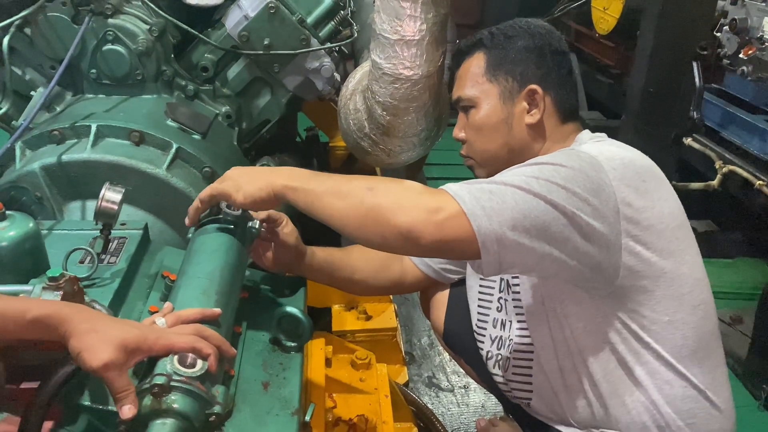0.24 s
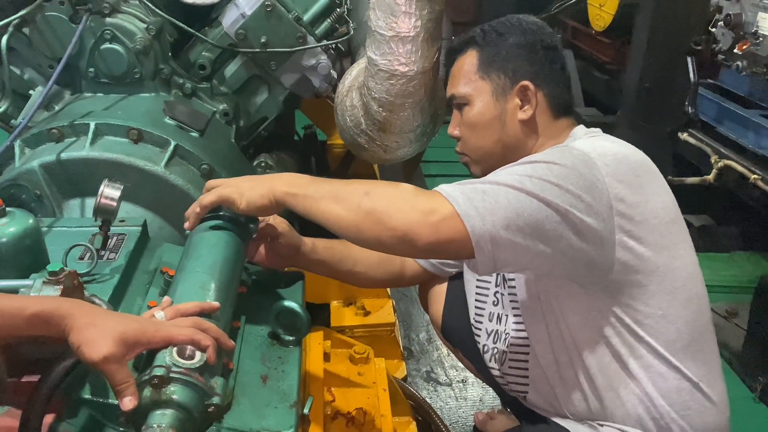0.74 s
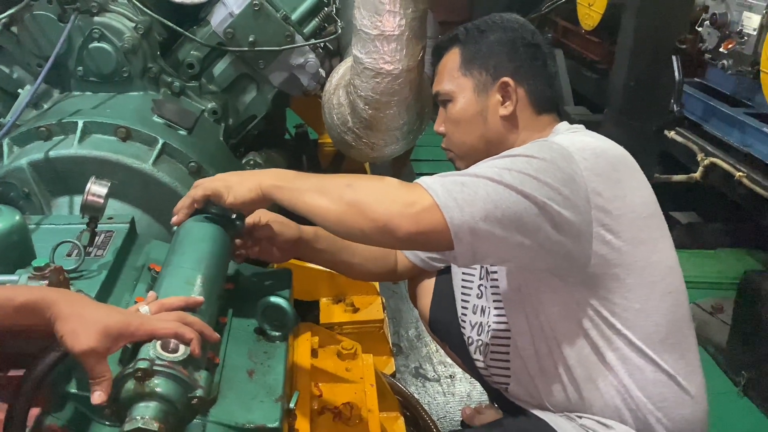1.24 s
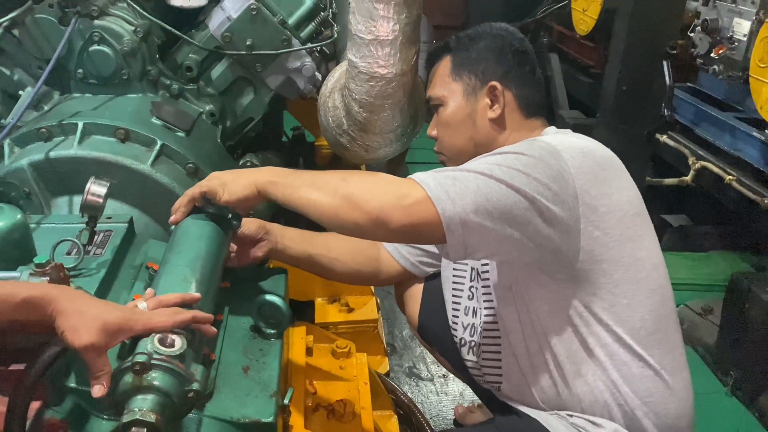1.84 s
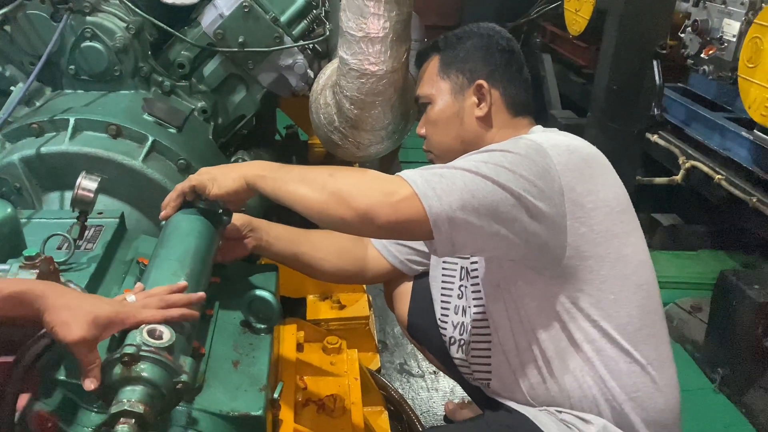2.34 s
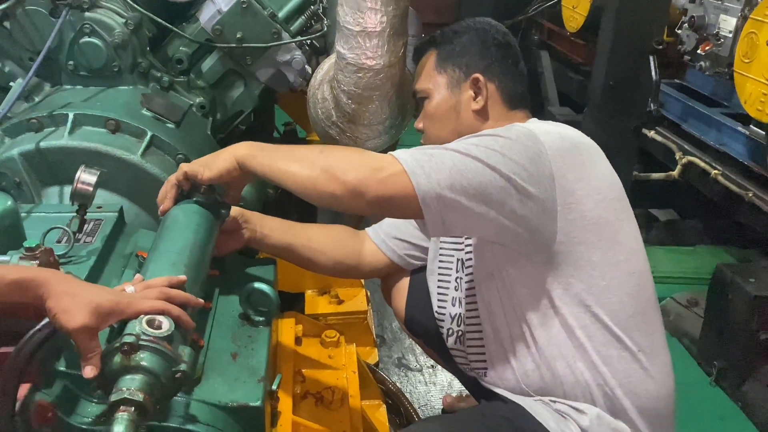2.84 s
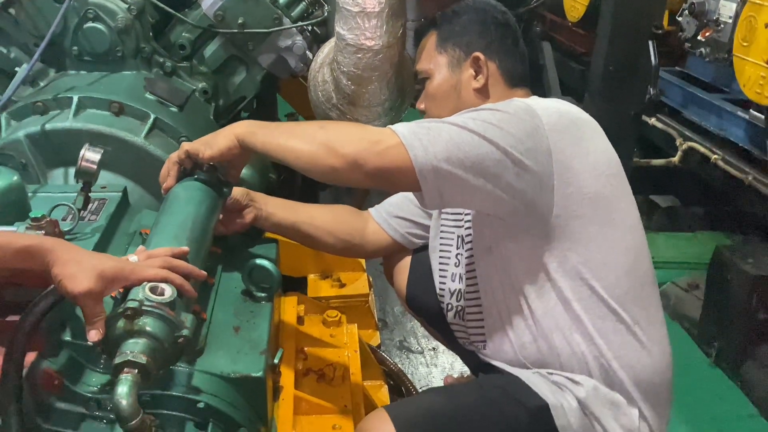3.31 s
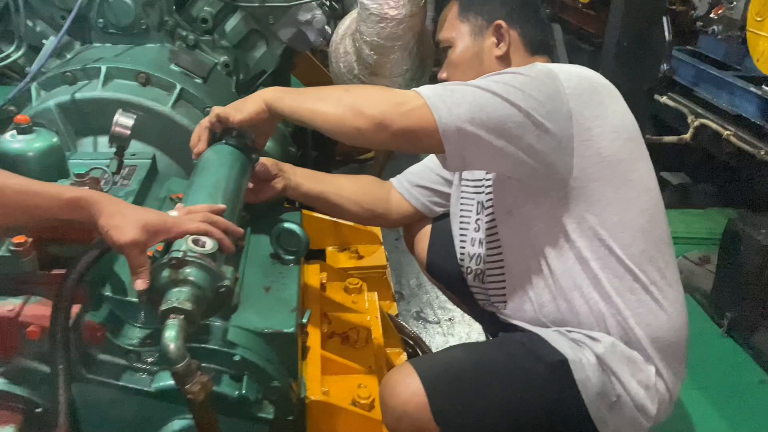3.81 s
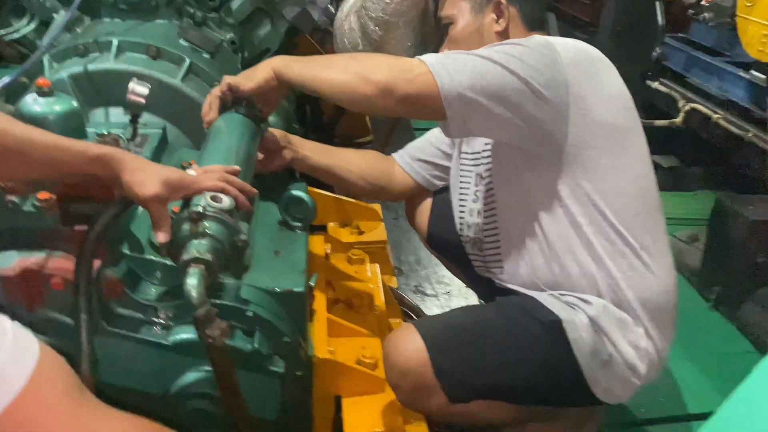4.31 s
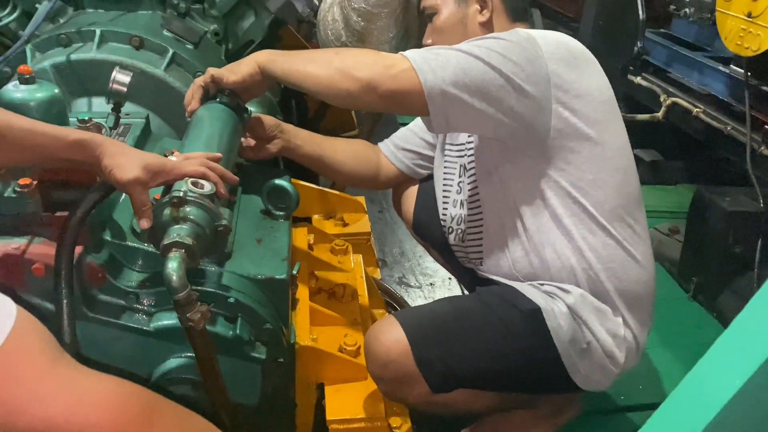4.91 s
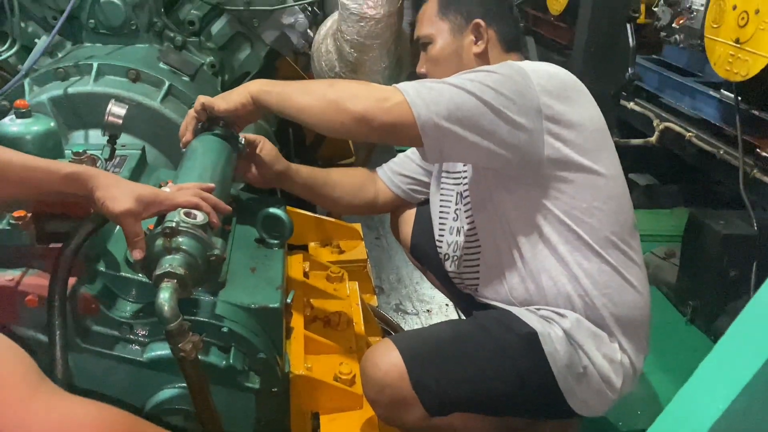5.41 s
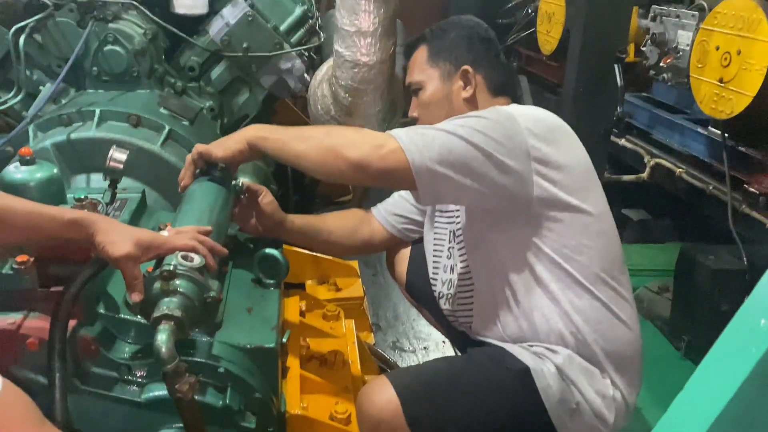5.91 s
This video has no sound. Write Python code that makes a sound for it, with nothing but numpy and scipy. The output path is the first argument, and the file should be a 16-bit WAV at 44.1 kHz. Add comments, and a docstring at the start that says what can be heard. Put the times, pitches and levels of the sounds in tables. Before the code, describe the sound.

A marine diesel idles steadily in a steel engine room, low rapid hull throb under a loud, slightly rough gear-pump whine that slowly fades.

```python
"""A marine diesel idles in a steel engine room, heard from beside its gearbox: hull thumps built of cycle harmonics.
Thin steady tones locked to engine speed ring on top and beat; valve clatter and rushing air are noise through
casing modes. A geared pump hums in shaft harmonics and whines at the tooth rate, in step with the engine.
The microphone rests, then drifts: the whine fades and its right side dips at a node."""
import sys
import numpy as np
from scipy import signal
from scipy.fft import rfft, irfft
from scipy.io import wavfile
from scipy.ndimage import uniform_filter1d

SR = 44100
rng = np.random.default_rng(int(sys.argv[2]) if len(sys.argv) > 2 else 0)


def generate_wav(signal):
    """Clip the signal to [-1, 1] and save it as 16-bit WAV at the path in sys.argv[1]."""
    frames = np.transpose(np.atleast_2d(signal))
    scaled = np.clip(frames, -1, 1) * 32767
    pcm = np.round(scaled).astype(np.int16)
    wavfile.write(sys.argv[1], SR, pcm)


N = 271215

# engine speed: (time [s], four-stroke cycle rate [Hz])
SPEED_CURVE = [(0, 12.288), (1.3, 12.263), (3, 12.286), (6.15, 12.296)]
START_CYCLE_HZ = SPEED_CURVE[0][1]
PUMP_RATIO = 6.4445  # shaft turns per engine cycle
MOVE_S = 1.44  # microphone rests until here, then drifts evenly to the end


def from_db(db):
    """Decibels to gain."""
    return 10 ** (np.asarray(db) / 20)


def in_time(rows):
    """Each column of a curve, sample by sample."""
    time_s, *columns = np.transpose(rows)
    return [np.interp(np.arange(N) / SR, time_s, column) for column in columns]


def at_hz(points, hz):
    """Read a spectrum on a log-frequency axis."""
    known_hz, values = np.transpose(points)
    return np.interp(np.log(hz + 1), np.log(known_hz + 1), values)


def pan(db):
    """Left and right gains for a left-right level difference."""
    return from_db(np.array([[.5], [-.5]]) * db)


def drift(corner_hz):
    """Slow noise of spread 1 whose spectrum falls off above corner_hz."""
    size = 8192
    hz = np.arange(size // 2 + 1) * SR / N
    slow = irfft(rfft(rng.standard_normal(size)) / (1 + (hz / corner_hz) ** 2))
    return np.interp(np.arange(N) * size / N, np.arange(size), slow / slow.std())


def tone(turns):
    """A sine of rms 1."""
    return np.sqrt(2) * np.sin(2 * np.pi * turns)


def travelled():
    """Share of the microphone's drift that lies behind it, 0 to 1."""
    return np.interp(np.arange(N) / SR, [MOVE_S, N / SR], [0, 1])


def along_path(start, end):
    """A value that changes evenly as the microphone drifts."""
    return start + (end - start) * travelled()


def at_ports(turns, hz, db, pan_db, lead_turns=0.056, spread_turns=0.14, waver_db=1.2):
    """A tone at both microphone ports; shorter waves fall further out of step, changing along the path."""
    # lead and spread hold at 800 Hz
    start, end = (hz / 800) ** 1.5 * (lead_turns + spread_turns * rng.standard_normal(2))
    lead = along_path(start, end)
    turns = turns + rng.random()
    pair = np.array([tone(turns + lead / 2), tone(turns - lead / 2)])
    return from_db(db + waver_db * drift(4.6)) * pan(pan_db) * pair


def engine_hum(cycles, level_db=0.6, uneven=0.055, quarter_turn_hz=500, thump_s=.0501):
    """One thump a cycle: harmonics delayed in phase by hull modes, each wavering; short waves differ at the ports."""
    # (multiple of cycle rate, start level before level_db [dB], end level [dB], left-right [dB])
    engine_orders = [(4, -41.0, -41.5, -3.0), (5, -43.0, -44.0, -3.0), (6, -42.0, -42.5, -3.5),
                     (7, -45.5, -44.0, -2.0), (8, -44.5, -40.0, -2.5), (9, -43.5, -43.0, -4.5),
                     (10, -51.0, -50.0, -4.5), (11, -45.5, -47.5, -0.5), (12, -39.0, -38.0, 0.0),
                     (13, -44.0, -45.5, -0.5), (14, -35.5, -33.5, -4.0), (15, -32.0, -32.0, -0.5),
                     (16, -40.5, -37.5, -2.5), (17, -47.5, -45.0, 1.5), (18, -46.0, -46.5, 1.5),
                     (19, -40.0, -42.0, -0.5), (20, -45.5, -43.5, -0.5), (24, -45.5, -50.5, 3.5),
                     (25, -41.5, -36.0, 2.0), (26, -39.5, -42.5, -4.0), (27, -45.5, -40.5, -3.0),
                     (28, -54.5, -48.0, -1.0)]
    # hull modes that hold the thump back: (frequency [Hz], width [Hz])
    hull_modes = [(71, 3), (74, 3), (143, 11), (177, 3), (230, 3), (245, 52), (247, 9), (328, 2)]
    out = 0
    for order, start_db, end_db, pan_db in engine_orders:
        hz = order * START_CYCLE_HZ
        lags_rad = [np.arctan2(width_hz / 2, mode_hz - hz) for mode_hz, width_hz in hull_modes]
        held_turns = sum(lags_rad) / (2 * np.pi)
        lead_turns = (hz / quarter_turn_hz) ** 1.5 / 4
        turns = order * cycles - hz * thump_s - held_turns
        line = np.array([tone(turns + lead_turns / 2), tone(turns - lead_turns / 2)])
        line = line * (1 + uneven * drift(5.9))
        out = out + from_db(along_path(start_db, end_db)) * line * pan(pan_db)
    return from_db(level_db) * out


def machine_tones(cycles, level_db=-1.2):
    """Thin steady tones locked to engine speed, singing in the casings; close neighbours beat."""
    # (frequency at first engine speed [Hz], start level before level_db [dB], end level [dB], left-right [dB])
    tones = [(88.5, -51, -51, -2), (205.1, -48, -48, -1), (316.7, -52, -52, -6), (374.9, -54, -49, -4),
             (393.1, -55, -48, -1), (417.6, -56, -53, 3), (464.1, -52, -48, 4), (515.9, -53, -51, 1),
             (600, -51, -49, 5), (614.2, -53, -48, 5), (629.7, -42, -48, 2), (638.7, -51, -49, 9),
             (663.3, -50, -50, 3), (700.3, -59, -47, 3), (724.9, -45, -48, 12), (755.5, -42, -48, 5),
             (767.6, -48, -56, 6), (814.1, -50, -45, 3), (816.4, -46, -40, 4), (823.2, -48, -55, 7),
             (826.5, -44, -45, 5), (847.7, -46, -49, 3), (858.8, -41, -46, 3), (881.4, -42, -35, 5),
             (883.4, -48, -42, 5), (926.8, -46, -46, 4), (929.8, -52, -43, 16), (937.9, -48, -45, 17),
             (939.3, -49, -47, 17), (1007.6, -48, -57, 2), (1029.5, -50, -54, -2), (1105.5, -52, -60, 6),
             (1108.5, -53, -53, 3), (1179.9, -54, -54, 1), (1192, -51, -48, -5), (1204.5, -51, -53, 1),
             (1253.5, -55, -51, 1), (1430.6, -53, -50, 8), (1662.8, -56, -50, -10)]
    out = 0
    for hz, start_db, end_db, pan_db in tones:
        turns = hz / START_CYCLE_HZ * cycles
        out = out + at_ports(turns, hz, level_db + along_path(start_db, end_db), pan_db)
    return out


def contact_pattern(cycles, count=6, clump_db=2.5, clump_s=.002):
    """Random contacts in uneven clumps, looped each cycle; the pattern crossfades gradually through count versions."""
    size = int(SR / START_CYCLE_HZ)
    place = np.round(cycles * size).astype(int) % size
    stage = np.linspace(0, count - 1, N)
    clumps = uniform_filter1d(rng.standard_normal(size), max(int(clump_s * SR), 1), mode="wrap")
    force = from_db(clump_db * clumps / clumps.std())
    force = force / np.sqrt(np.mean(force ** 2))
    out = 0
    for k in range(count):
        contacts = force * rng.standard_normal((2, size))
        fade = np.cos(np.pi / 2 * np.clip(stage - k, -1, 1))  # equal power
        out = out + contacts[:, place] * fade
    return out


def casings(field, count=7, shift_db=2.0):
    """Casing resonances colour a spectrum; each lift follows the drift and shifts by chance from stage to stage."""
    # (frequency [Hz], width [Hz], start lift before chance shifts [dB], end lift [dB])
    casing_modes = [(592, 55, 9.5, 7.5), (632, 53, 5, 7), (691, 32, 6, 13.5), (813, 38, 5, 15.5),
                    (792, 56, 9, 2), (858, 75, 7, -1), (944, 57, 10, 8), (986, 37, -5, 8),
                    (1130, 18, 8.5, 6), (1175, 55, 5, 5), (1304, 33, 7, 2), (1423, 43, 6, 7.5),
                    (1588, 26, 4.5, 3), (1657, 23, 7, 1), (1750, 40, 6.5, 6), (1925, 34, 6.5, 7),
                    (2040, 33, 3, -1), (2125, 23, 9.5, 3), (2480, 31, 6, 3.5), (2616, 86, 7.5, 7.5),
                    (2774, 46, 6.5, 4), (3010, 73, 8.5, 3), (3180, 34, 6.5, 8), (3430, 47, 7.5, 8),
                    (3730, 69, 7, 5), (4000, 35, 6, 1), (4140, 100, 5.5, 5.5), (4304, 45, 11, 5.5),
                    (4610, 70, 8, 3), (4980, 170, 5.5, 2), (5600, 165, 2, 3), (8000, 540, -0.5, -3)]
    hz = np.arange(N // 2 + 1) * SR / N
    mode_hz, width_hz, start_db, end_db = np.transpose(casing_modes)
    bells = 1 / (1 + (2 * (hz - mode_hz[:, None]) / width_hz[:, None]) ** 2)
    stage, way, out = np.linspace(0, count - 1, N), travelled(), 0
    for k in range(count):
        # short waves shift most
        chance_db = shift_db * np.minimum(mode_hz / 2000, 1) * rng.standard_normal(len(casing_modes))
        lifts_db = start_db + (end_db - start_db) * np.interp(k, stage, way) + chance_db
        fade = np.maximum(1 - abs(stage - k), 0)
        out = out + fade * irfft(field * from_db(lifts_db @ bells), N)
    return out


def clatter(cycles, growl_db=1.53, rest_hiss_db=-4, hiss_fade_db=2.6, repeat_share=0.44, knock_db=0.24,
            grain_db=1.0, light_hz=350, air_hz=4200, hiss_hz=3500, flutter_db=0.96):
    """Small contacts recurring every cycle mix with fresh turbulence; both ring in the casings over a low rumble."""
    # spectra ahead of the casings, below and above: (frequency [Hz], density [dB per Hz])
    rumble = [(20, -78), (40, -76), (60, -67.3), (110, -66), (160, -64), (260, -65), (320, -64), (370, -66),
              (480, -64.5)]
    rush = [(700, -68.5), (1050, -65.5), (2000, -67), (3400, -73), (5000, -75.5), (6300, -78),
            (7600, -84.5), (11000, -86), (12500, -100), (14500, -92)]
    # (frequency [Hz], left-right likeness [0-1])
    likeness = [(105, .9), (250, .55), (450, .55), (780, .5), (1050, .25), (1250, .5), (1700, .48),
                (2100, .4), (2400, .2), (7000, .15), (10000, .6), (13000, .5)]
    # (frequency [Hz], phase by which the left leads [turns])
    left_lead = [(100, 0), (450, .08), (780, .05), (900, .22), (1050, .52), (1250, .63), (1500, .82),
                 (2100, .77), (2400, 1.25), (8400, 1.35), (9700, 1), (11000, 1), (13000, 1.5)]
    # (frequency [Hz], left-right [dB])
    balance = [(60, -2), (200, 10), (450, 0.5), (680, 2), (950, 4), (1400, 1.5), (2400, -0.5), (3700, 3.5),
               (6300, 3), (9500, 0)]
    hz = np.arange(N // 2 + 1) * SR / N
    force = from_db(grain_db * drift(77))  # some contacts land harder
    force = force / np.sqrt(np.mean(force ** 2))
    contacts = rfft(contact_pattern(cycles) * force)
    air = rfft(rng.standard_normal((2, N)))
    # light contacts carry little bass; the top is mostly air
    share = np.clip(repeat_share, 0, 1) * hz ** 2 / (hz ** 2 + light_hz ** 2) / (1 + (hz / air_hz) ** 2)
    mid, side = np.sqrt(share) * contacts + np.sqrt(1 - share) * air
    alike = np.clip(at_hz(likeness, hz), -1, 1)
    field = np.sqrt((1 + alike) / 2) * mid + np.sqrt((1 - alike) / 2) * side * [[1], [-1]]
    field = field * np.exp(1j * np.pi * at_hz(left_lead, hz) * [[1], [-1]])
    field = field * from_db(at_hz(rumble + rush, hz)) * np.sqrt(SR / 2)
    field = field * pan(at_hz(balance, hz))
    rung = casings(field)
    hiss = irfft(rfft(rung) * hz ** 2 / (hz ** 2 + hiss_hz ** 2), N)
    growl = rung - hiss
    # the treble pulses with the engine cycle and flutters
    hiss_db = rest_hiss_db - hiss_fade_db * travelled()
    hiss_db = hiss_db - knock_db * np.cos(2 * np.pi * cycles) + flutter_db * drift(25)
    return from_db(growl_db) * growl + from_db(hiss_db) * hiss


def pump_hum(shaft):
    """Shaft harmonics around the tooth rate; levels change along the microphone's path through standing waves."""
    # (multiple of shaft rate, start level [dB rms], end level [dB rms], left-right [dB])
    pump_orders = [(5, -41.5, -48, -4.5), (6, -40.8, -45, -5.5), (7, -47.5, -44.5, -3), (8, -43, -39.5, 4)]
    # the whine's loud neighbours, by multiple of shaft rate: (time [s], level [dB rms], left-right [dB])
    neighbours = {9: [(0, -43, -7), (2.7, -47, -7), (3.3, -33.5, -5), (3.7, -32, 4), (4.6, -37, 8),
                  (6.15, -37, 6)], 11: [(0, -35, -4), (1.85, -40.5, 6), (2.2, -34, -7), (2.55, -32, 0),
                  (3.2, -44.5, 0), (3.7, -34, -2), (4.3, -57, -8), (5.1, -36.5, 7), (6.15, -39, -3)],
                  12: [(0, -44, 11), (2.9, -40, -12), (3.6, -48, -3), (4, -43.5, 11), (6.15, -39, 5)]}
    lines = [(order, along_path(start_db, end_db), pan_db) for order, start_db, end_db, pan_db in pump_orders]
    lines += [(round(order), *in_time(curve)) for order, curve in neighbours.items()]
    shaft_hz = PUMP_RATIO * START_CYCLE_HZ
    return sum(at_ports(order * shaft, order * shaft_hz, db, pan_db) for order, db, pan_db in lines)


def whine(shaft, cycles, teeth=10, throb=0.16, twist_turns=0.039, rough=0.02, jitter_turns=0.009,
          load_turns=0.51, waver_db=0.12):
    """Meshing teeth, loaded and twisted once per engine cycle; fades with the drift, the right crossing a node."""
    # shaft swings about its mean speed, bending the pitch: (swing rate [Hz], swing [turns of the tooth rate])
    shaft_swings = [(6.4, 0.025), (9.9, 0.02)]
    rest_db, fade_db, rest_pan_db, pan_growth_db = -20.5, 8.5, 5.5, 5  # fade and growth over the whole drift
    node_s, node_width_s, node_depth_db = 3.5, 0.42, 4
    # phase between the ports spreads with the drift and turns over just past the node
    spread_turns, turnover_s, turnover_width_s = 0.46, 3.8, 0.29
    way, time_s = travelled(), np.arange(N) / SR
    level = from_db(rest_db - fade_db * way + waver_db * drift(0.93))
    left, right = level * pan(rest_pan_db + pan_growth_db * way)
    node = np.exp(-((time_s - node_s) / node_width_s) ** 2)
    right = right * from_db(-node_depth_db * node)
    lead_turns = spread_turns * way * np.tanh((time_s - turnover_s) / turnover_width_s)
    angle = 2 * np.pi * (cycles - load_turns)
    load = 1 + throb * np.cos(angle) + rough * drift(30)
    mesh = teeth * shaft + twist_turns * np.sin(angle) + jitter_turns * drift(27)
    for rate_hz, swing_turns in shaft_swings:
        mesh = mesh + swing_turns * np.sin(2 * np.pi * (rate_hz * time_s + rng.random()))
    return load * np.array([left * tone(mesh), right * tone(mesh - lead_turns)])


def scene():
    """One crankshaft paces everything; the pump shaft is geared to it."""
    cycles = np.cumsum(in_time(SPEED_CURVE)[0]) / SR
    shaft = PUMP_RATIO * cycles
    engine_room = engine_hum(cycles) + machine_tones(cycles) + clatter(cycles)
    return engine_room + pump_hum(shaft) + whine(shaft, cycles)


def record(dry):
    """A steep elliptic low-pass cuts the top at 15.7 kHz."""
    return signal.sosfilt(signal.ellip(10, .1, 80, 15700, fs=SR, output="sos"), dry)


dry = scene()
out = record(dry)
generate_wav(out)
```